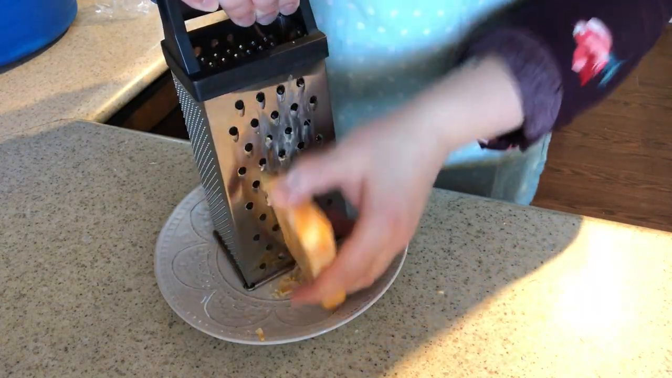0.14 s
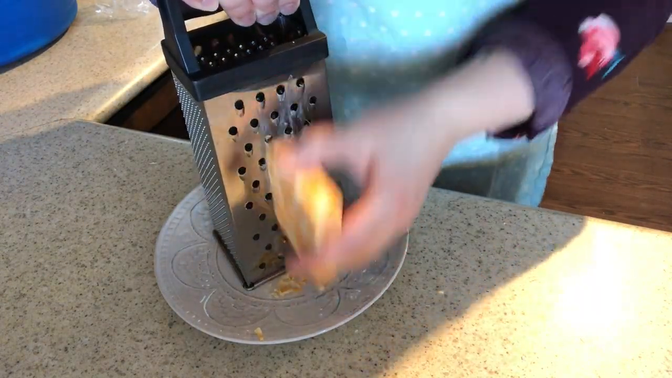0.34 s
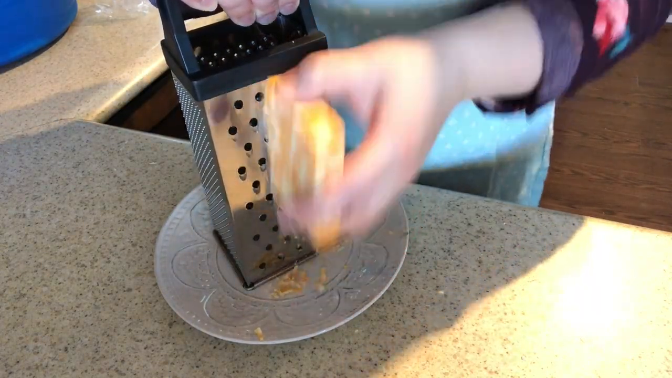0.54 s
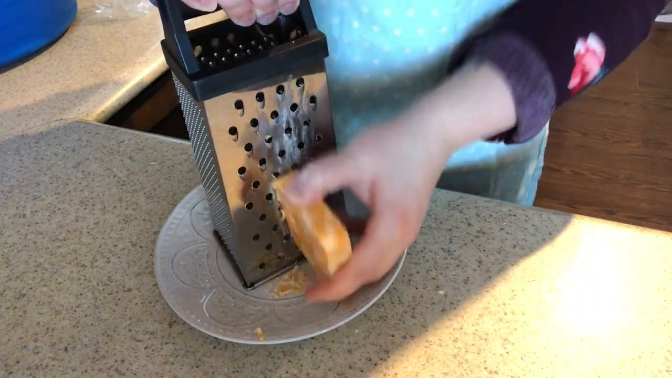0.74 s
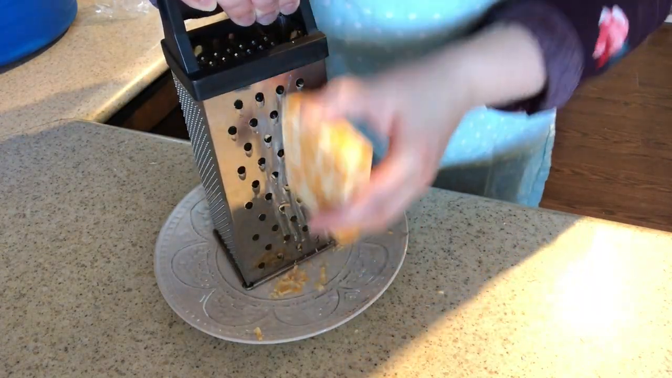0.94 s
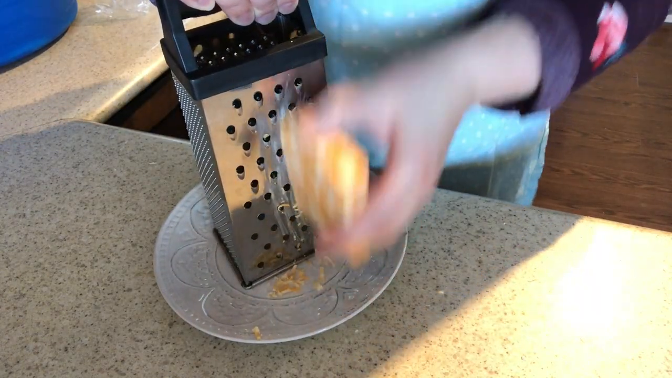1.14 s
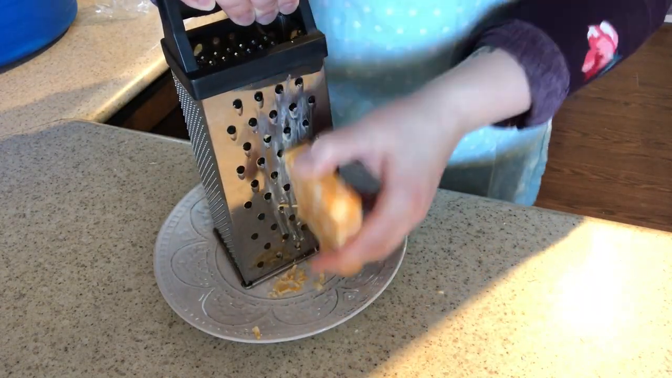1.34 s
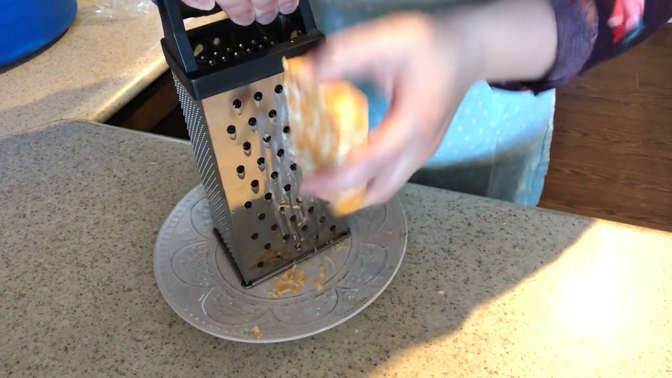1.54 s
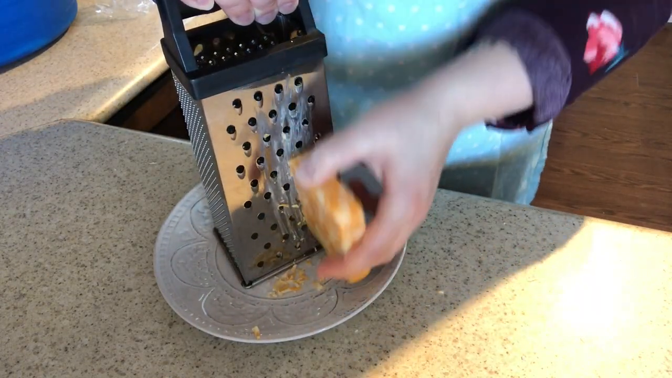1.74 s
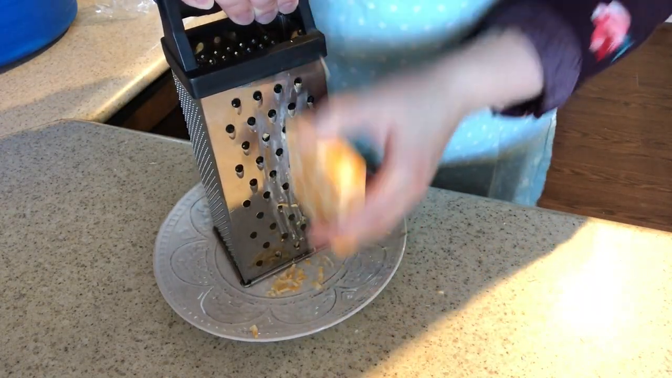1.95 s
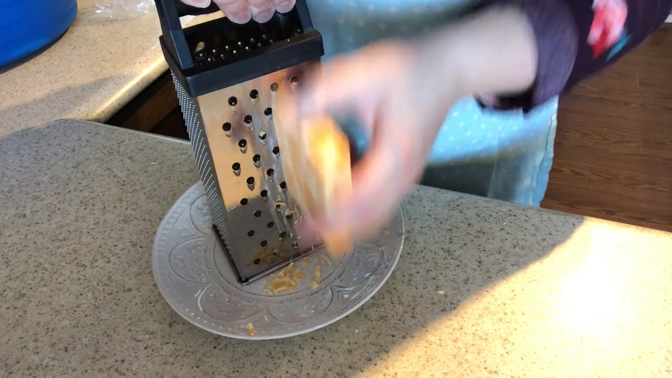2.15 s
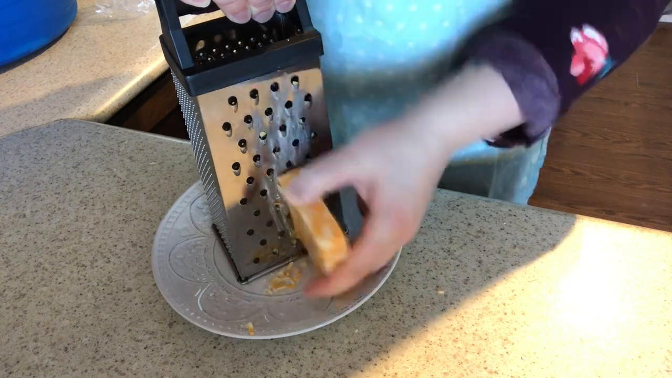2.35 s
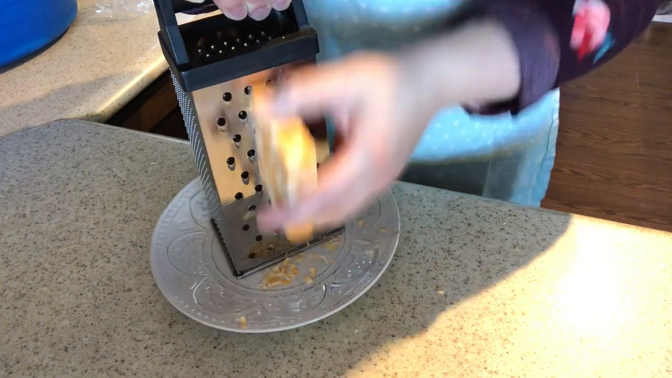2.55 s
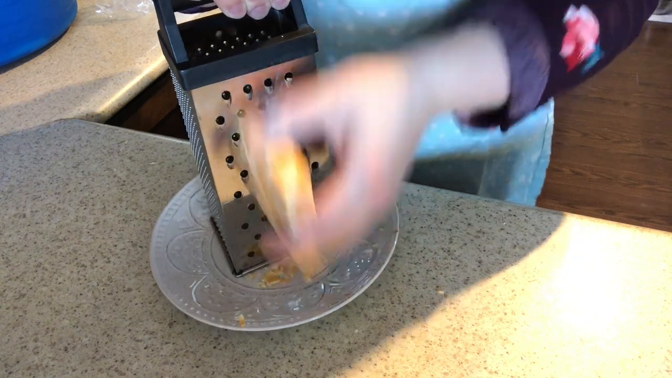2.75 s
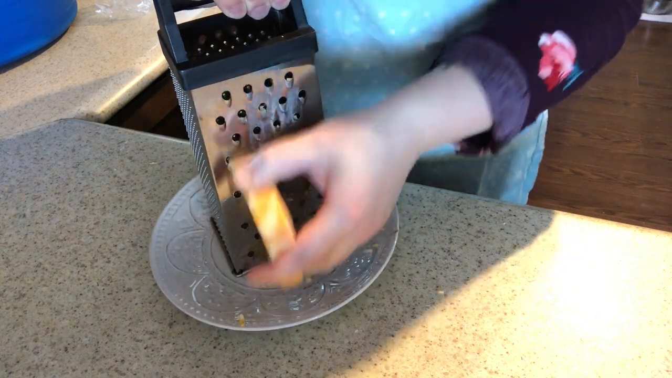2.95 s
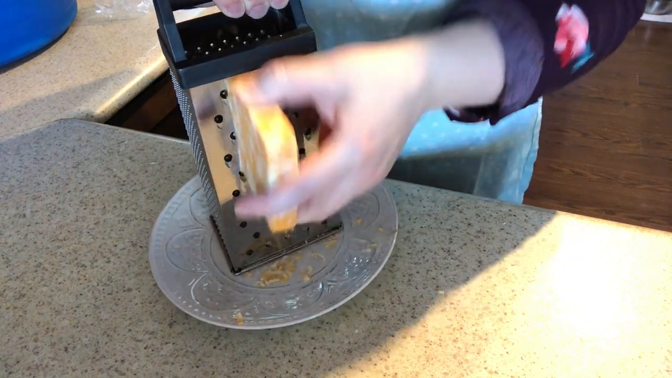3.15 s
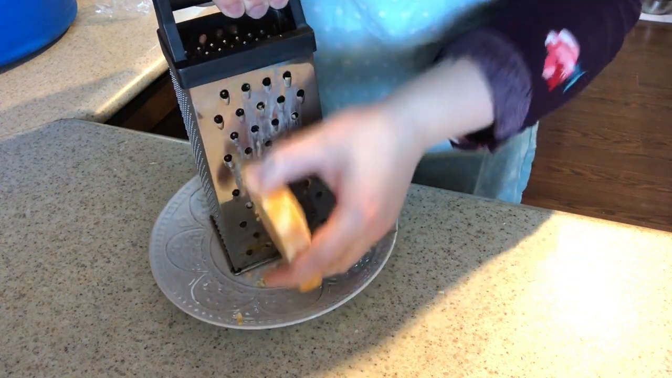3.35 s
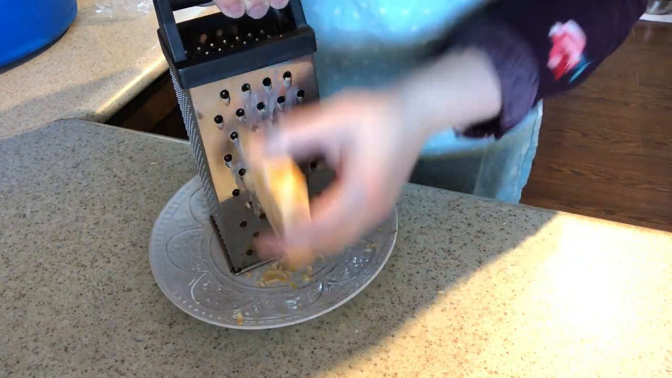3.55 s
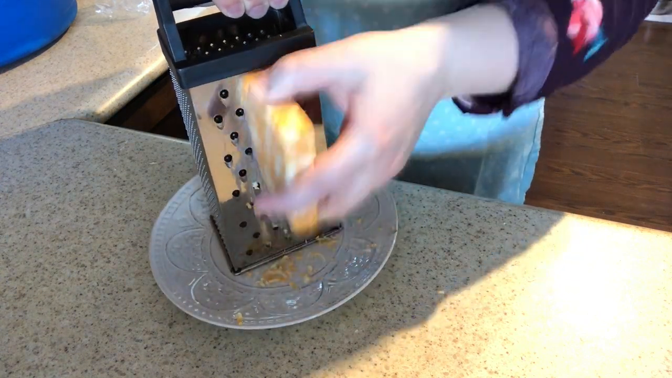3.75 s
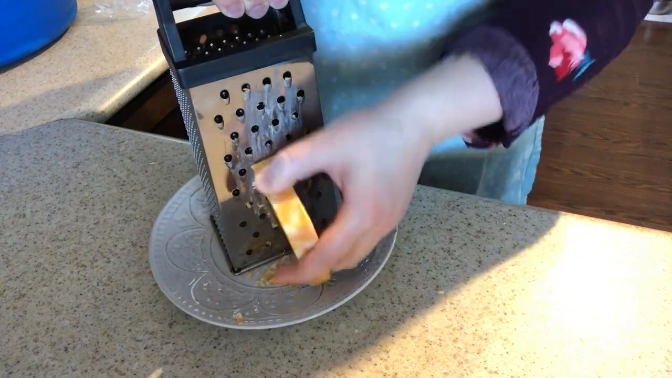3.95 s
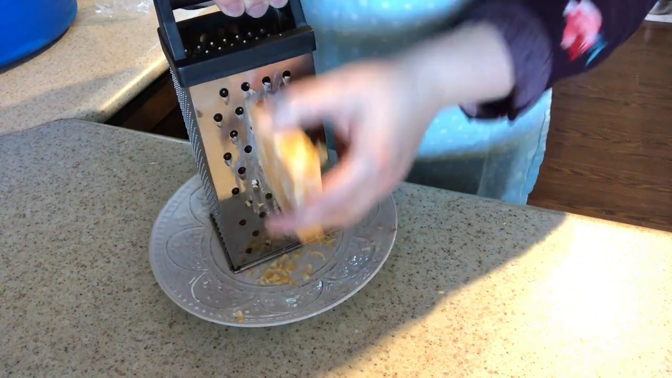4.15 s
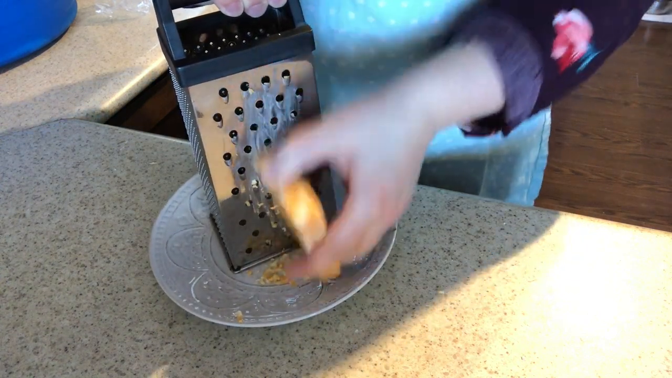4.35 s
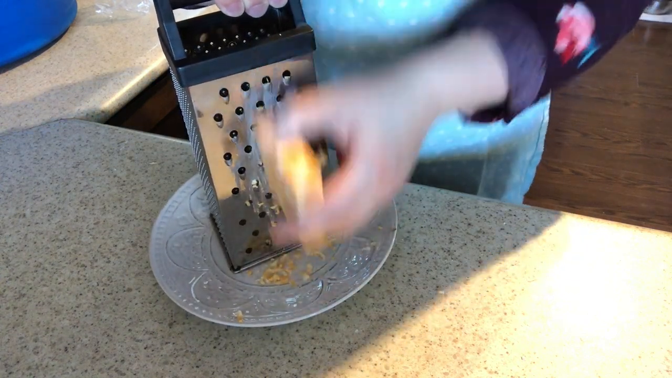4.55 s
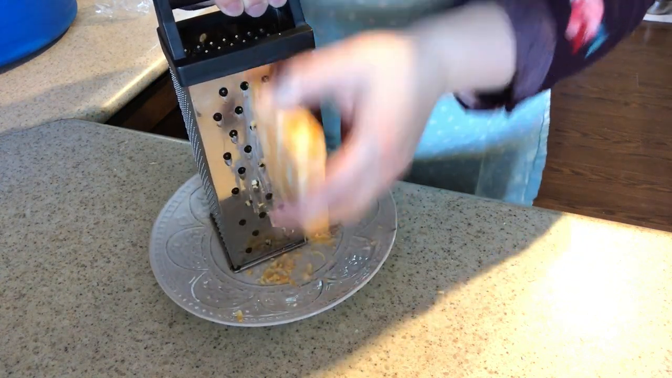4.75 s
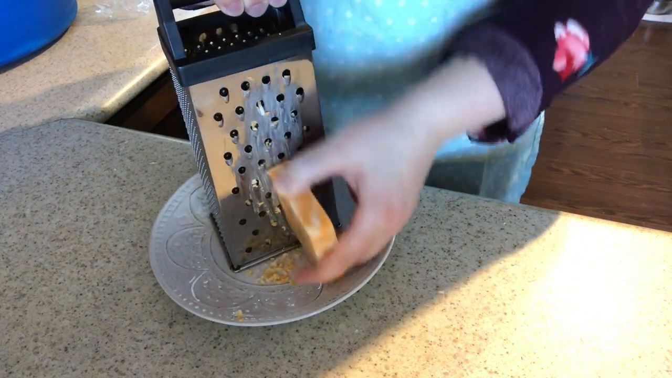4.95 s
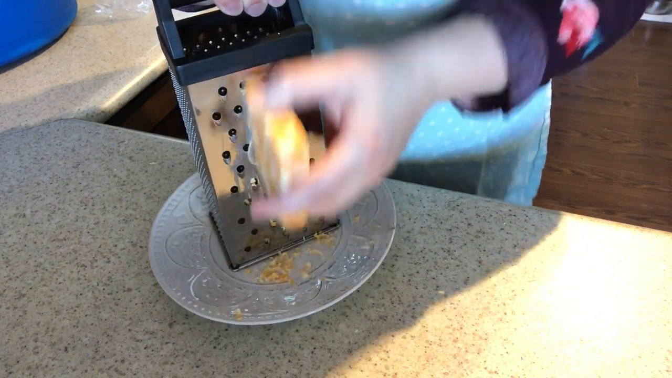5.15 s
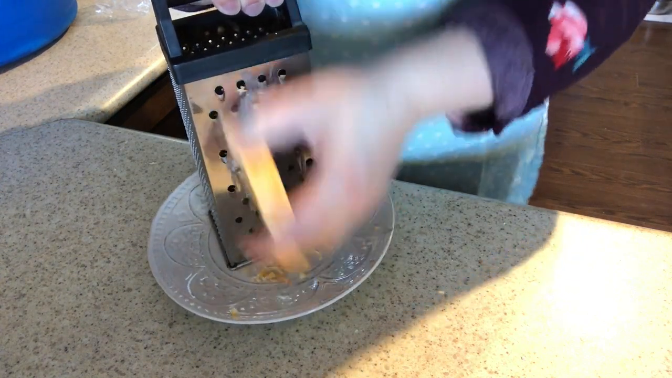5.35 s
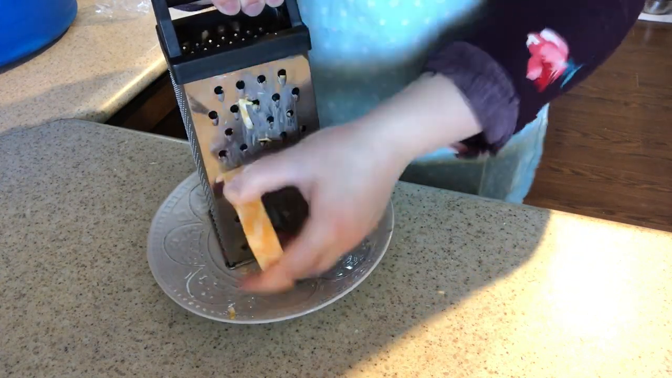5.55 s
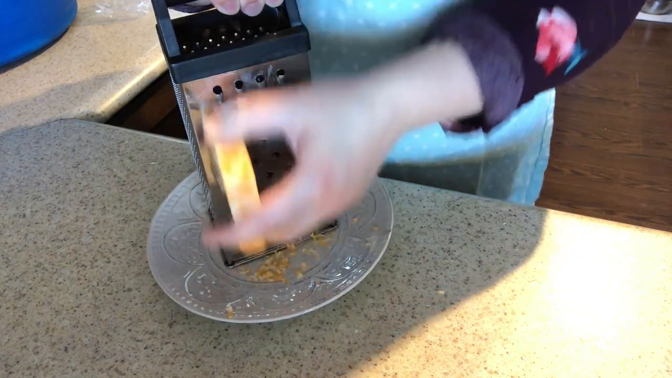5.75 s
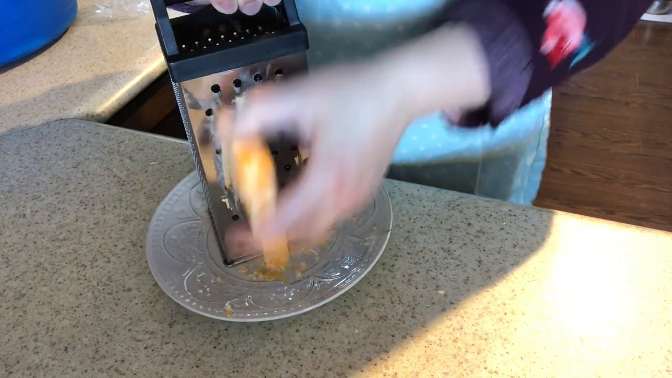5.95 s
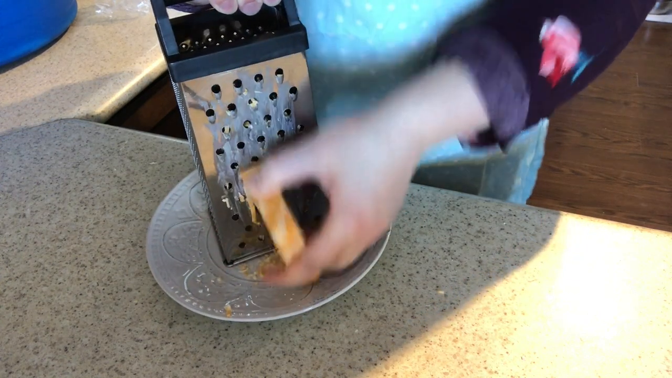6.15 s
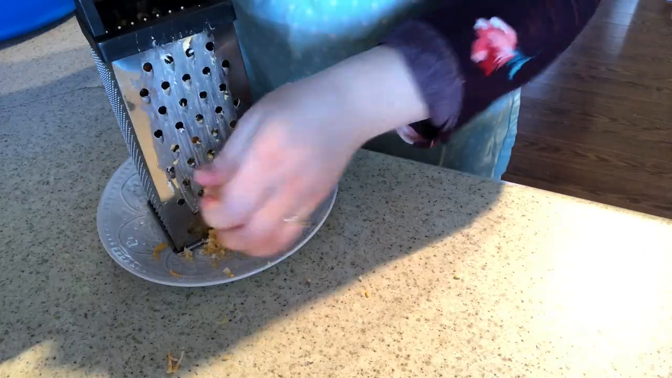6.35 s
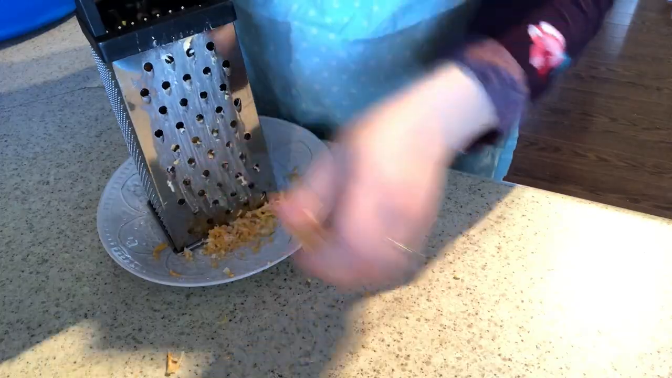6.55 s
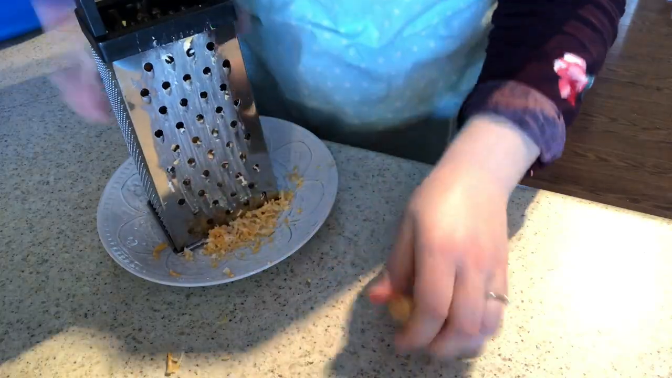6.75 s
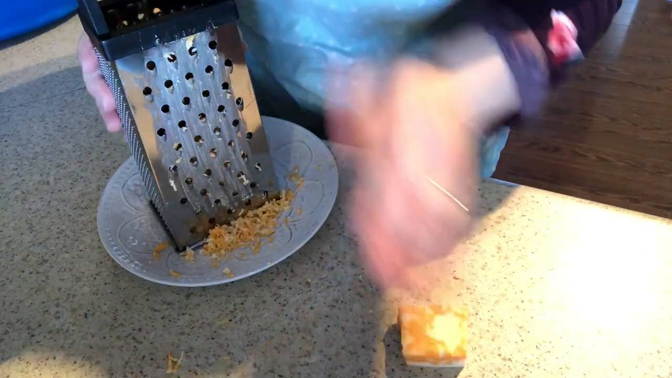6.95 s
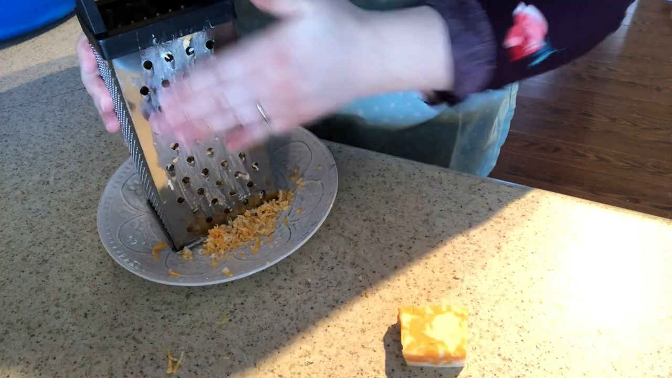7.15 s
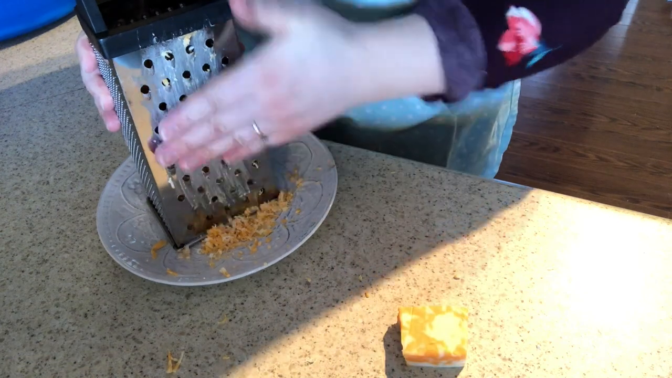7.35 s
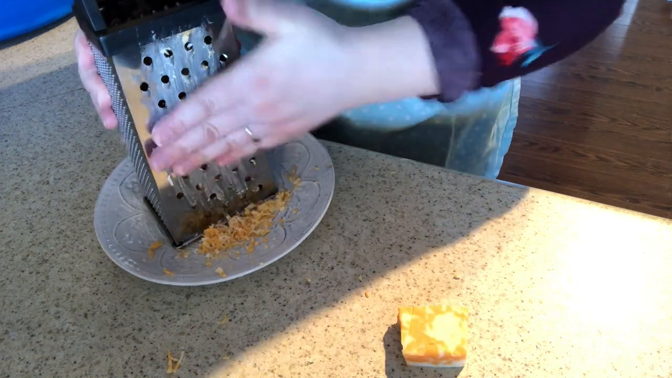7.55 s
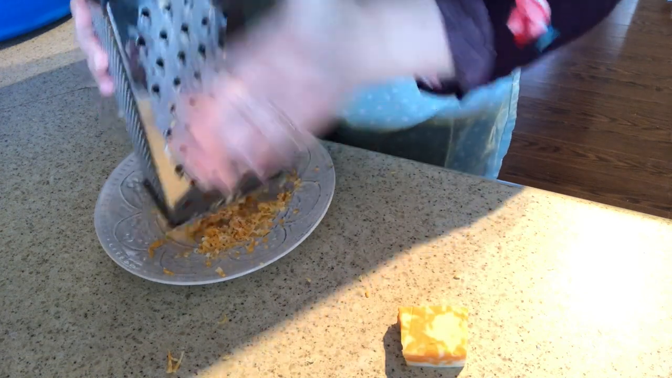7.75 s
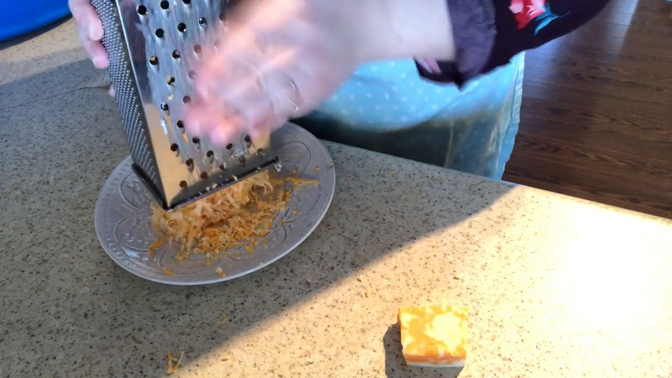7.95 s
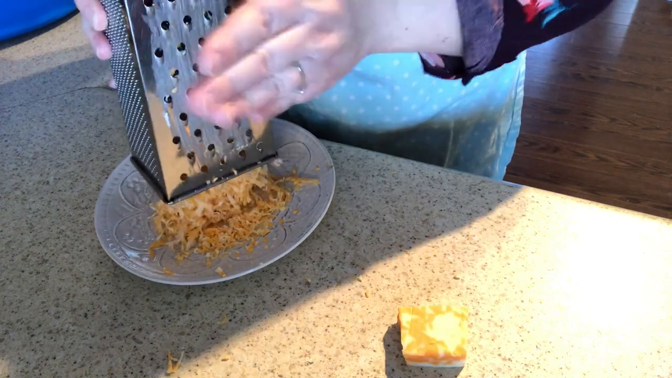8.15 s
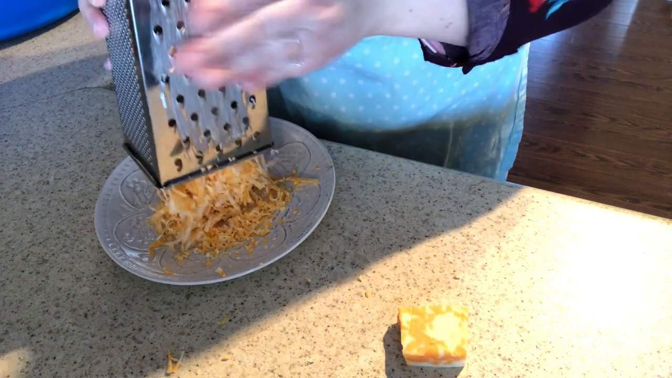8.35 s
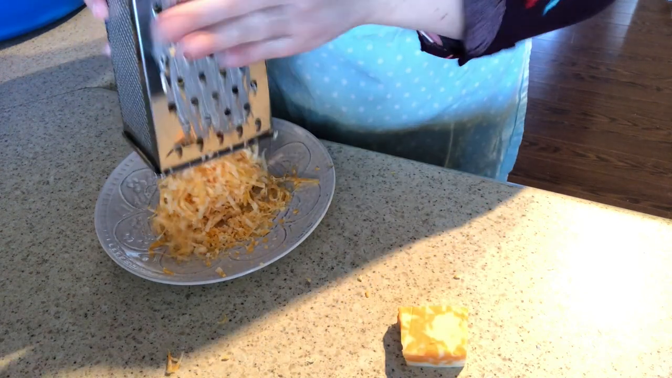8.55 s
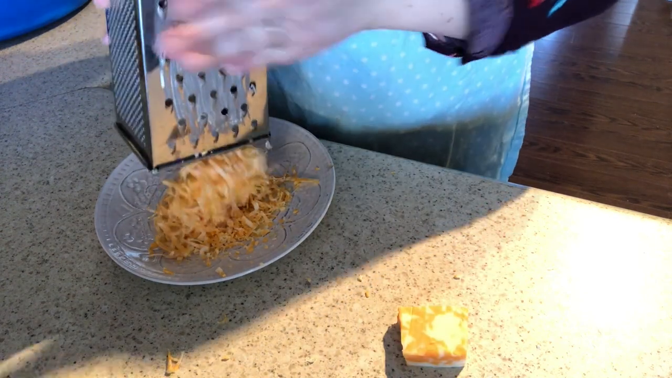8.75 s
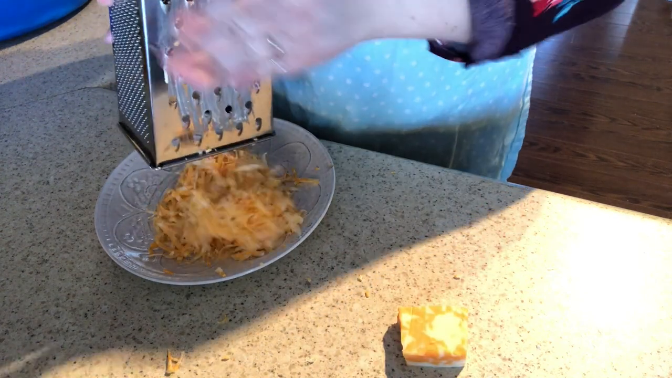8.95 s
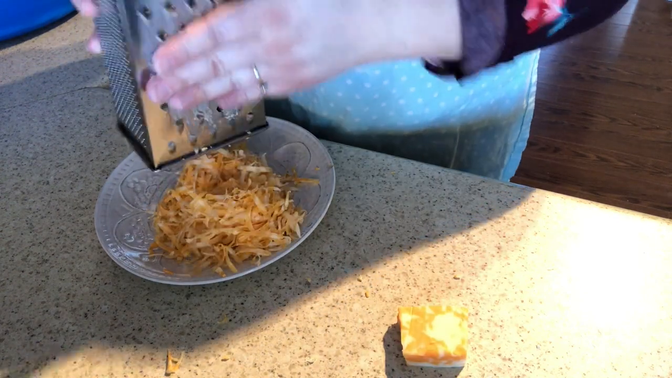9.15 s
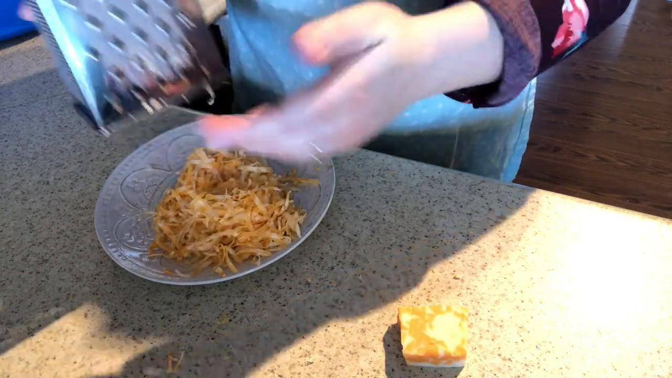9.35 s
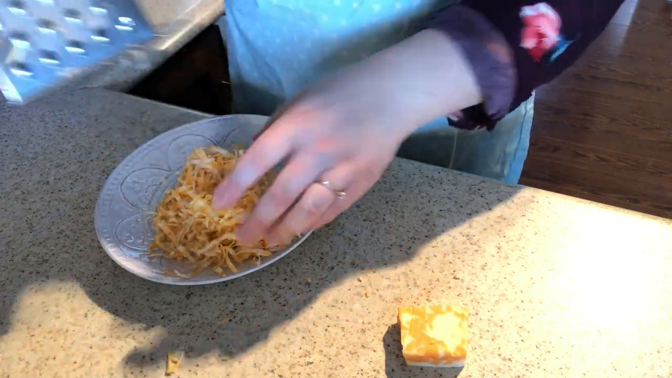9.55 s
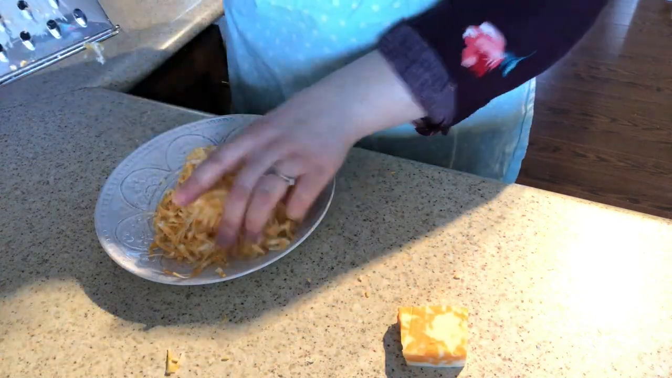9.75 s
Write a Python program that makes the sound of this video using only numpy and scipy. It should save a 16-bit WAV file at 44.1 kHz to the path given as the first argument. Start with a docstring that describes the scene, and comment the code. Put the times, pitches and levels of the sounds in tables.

```python
"""In a quiet kitchen, a block of cheese is worked down and up a steel box grater standing on a plate.
Each stroke lands with a soft smack, then the teeth catch and slip in a rumble and a rasp. Along the way
bumps boom in the counter, fingers squeak on the cheese and the grater's foot clinks the plate three times.
From about 6.5 s fingers and a sleeve rustle as the cheese is put down. From 7.1 s a flat hand slaps
the grater ten times to shake the shreds out."""
import sys
import numpy as np
from scipy import signal
from scipy.fft import rfft, irfft
from scipy.io import wavfile
from scipy.ndimage import uniform_filter1d

SR = 44100
rng = np.random.default_rng(int(sys.argv[2]) if len(sys.argv) > 2 else 0)


def digitize_waveform(pressure):
    """Quantize a signal to 16-bit integers and store it at the path in sys.argv[1].

    Rows of a 2-D input are taken as channels; values are limited to [-1, 1].
    """
    field = np.atleast_2d(pressure).T
    bounded = np.clip(field, -1, 1)
    quanta = np.round(bounded * 32767).astype(np.int16)
    wavfile.write(sys.argv[1], SR, quanta)


N = 432180
HIT_SAMPLES = 12288
HIT_TIME = np.arange(HIT_SAMPLES) / SR


def from_db(db):
    """Decibels to gain."""
    return 10 ** (np.asarray(db) / 20)


def unit(x):
    """Scale to rms 1."""
    return x / np.sqrt(np.mean(x ** 2) + 1e-20)


def at_hz(points, hz):
    """Read a curve along a log-frequency axis."""
    known_hz, values = np.transpose(points)
    return np.interp(np.log(np.maximum(hz, 1)), np.log(known_hz), values)


def bins(x):
    """Frequencies of the spectrum of x."""
    return np.fft.rfftfreq(len(x), 1 / SR)


def eq(x, curve):
    """Shape x with a smooth EQ curve."""
    return irfft(rfft(x) * from_db(at_hz(curve, bins(x))), len(x))


def band(x, low_hz, high_hz):
    """Causal band-pass."""
    edges_hz = [low_hz, min(high_hz, .45 * SR)]
    return signal.sosfilt(signal.butter(2, edges_hz, "band", fs=SR, output="sos"), x)


def add(out, s, sound):
    """Mix a sound in at time s."""
    start = max(round(s * SR), 0)
    out[start:start + len(sound)] += sound[:N - start]


def envelope(rise_s, t60):
    """A percussive attack and an exponential decay."""
    return (1 - np.exp(-HIT_TIME / rise_s)) * from_db(-60 * HIT_TIME / t60)


def burst(rise_s, t60):
    """A dense spray of tiny contacts that swells and dies away."""
    return rng.standard_normal(HIT_SAMPLES) * envelope(rise_s, t60)


def grains(per_s, spread_db):
    """Random clicks of uneven size."""
    sizes = from_db(spread_db * np.minimum(rng.exponential(1, N), 4))
    return (rng.random(N) < per_s / SR) * sizes * rng.choice([-1, 1], N)


def wander(per_s):
    """A smooth random curve of spread about 1."""
    knots = rng.standard_normal(4000)
    return np.interp(np.arange(N) / SR * per_s, np.arange(len(knots)), knots)


def swells(starts_s, lengths_s, levels_db, attack_s, release_s, ramp_db_per_s):
    """A gain curve of gestures: each fades in, ramps through its level and tails off gently."""
    out = np.zeros(N)
    for s, length_s, db in zip(starts_s, lengths_s, levels_db):
        t = np.arange(0, length_s, 1 / SR)
        fade_in = np.sin(np.pi / 2 * np.clip(t / attack_s, 0, 1))
        fade_out = np.sin(np.pi / 2 * np.clip((length_s - t) / release_s, 0, 1)) ** 1.4
        add(out, s, from_db(db + ramp_db_per_s * (t - length_s / 2)) * fade_in * fade_out)
    return out


# the still kitchen's noise floor: (frequency [Hz], level [dB])
ROOM_TONE_EQ = [(18, -30), (30, 2), (48, -8.5), (59, -11), (141, -11), (179, -13), (311, -21.5),
                (449, -19.5), (1390, -30), (14400, -44), (16000, -44.5)]


def room_tone():
    """A faint, dark bed of noise under the whole scene."""
    return from_db(-67.5) * unit(eq(rng.standard_normal(N), ROOM_TONE_EQ))


# modes of the hand-held steel shell: (frequency [Hz], width [Hz], weight [dB, halved in use])
SHELL_MODES = [(329.3, 58, 7.5), (536, 42, -9.5), (1120, 11, -15.5), (2247, 55, 2.5), (3520, 190, -9),
               (4180, 27, -14), (5140, 990, -12.5), (5824, 50, -8), (6300, 52, -7), (6500, 80, -2),
               (7400, 1200, -1.5)]


def shell(x, ring_db):
    """Resonances stand out of the broad sound of the grater's walls; each new grip detunes them."""
    hz = bins(x)
    detunes = 1 + .015 * rng.standard_normal(len(SHELL_MODES))
    modes = sum(from_db(db / 2) / (1 + 2j * (hz - centre * detune) / width)
                for (centre, width, db), detune in zip(SHELL_MODES, detunes))
    return irfft(rfft(x) * (1 + from_db(ring_db) * modes), len(x))


# strokes, about three round trips a second:
# (time [s], length [s], landing smack level [dB], rumble level [dB], rasp level [dB])
GRATER_STROKES = [(0.0, 0.14, -64, -49, -63), (0.078, 0.12, -68, -49.5, -68.5),
                  (0.162, 0.15, -58, -54.5, -62.5), (0.305, 0.17, -49.5, -53.5, -64.5),
                  (0.4606, .16, -48, -52.5, -62.5), (0.621, 0.17, -54, -51, -61.5),
                  (0.791, 0.16, -62, -56, -66), (0.96, .22, -63.5, -51, -65),
                  (1.279, 0.15, -67, -54.5, -64), (1.423, 0.21, -54.5, -52.5, -59.5),
                  (1.584, 0.16, -49.5, -51.5, -62.5), (1.773, .14, -51.5, -50, -59.5),
                  (1.919, 0.17, -54, -49, -60), (2.074, 0.19, -53, -51, -61), (2.253, 0.26, -63, -47, -61),
                  (2.431, 0.16, -49, -82, -57.5), (2.566, 0.2, -56, -52.5, -61.5),
                  (2.712, 0.15, -46.5, -47, -60.5), (2.859, 0.16, -52, -53.5, -62.5),
                  (3.037, 0.13, -49.5, -47.5, -58.5), (3.171, 0.19, -58.5, -53.5, -61.5),
                  (3.365, 0.16, -52.5, -52.5, -62.5), (3.512, 0.16, -65, -53.5, -63),
                  (3.667, 0.18, -48.5, -51, -61.5), (3.829, 0.15, -68, -55.5, -64),
                  (3.997, 0.16, -48.5, -48, -60.5), (4.158, 0.16, -67, -51, -63.5),
                  (4.318, 0.19, -59, -53, -66), (4.473, 0.22, -62.5, -52, -62.5),
                  (4.651, 0.17, -48, -53.5, -61), (4.831, 0.16, -71.5, -46.5, -57.5),
                  (4.975, 0.18, -60, -51.5, -63), (5.129, 0.19, -71, -51, -62),
                  (5.289, 0.15, -45, -48, -57.5), (5.445, .16, -65.5, -48.5, -61),
                  (5.587, 0.16, -56.5, -48.5, -58.5), (5.722, 0.24, -53, -48, -60),
                  (5.91, 0.13, -58.5, -50.5, -63), (6.035, 0.22, -71, -51.5, -63),
                  (6.149, 0.16, -45, -51.5, -63), (6.475, 0.17, -77, -50, -64)]
# low end of the pressed sheet: (frequency [Hz], level [dB])
RUMBLE_EQ = [(18, -46), (30, -17.5), (65, -1), (113, -6), (152, 2.5), (194, -3), (254, -0.5), (284, -11.5),
             (389, -5), (436, -18), (900, -24), (1170, -48), (1980, -120)]
# grit of the teeth: (frequency [Hz], level [dB])
RASP_EQ = [(290, -37.5), (500, 0.5), (595, -11.5), (761, 0.5), (1420, -5), (2130, -7), (2330, -8.5),
           (4530, -12.5), (8700, -26.5), (15100, -27), (16000, -33.5)]


def grating():
    """Teeth catch and slip: big slips shake the sheet, fine tearing makes the rasp."""
    s, length_s, _, rumble_db, rasp_db = np.transpose(GRATER_STROKES)
    # the hand leans in, then eases off before the turn
    pressure = swells(s, length_s, rumble_db, attack_s=.06, release_s=.093, ramp_db_per_s=14)
    # the teeth bite sooner than the sheet shakes, and the rasp fades as the holes fill
    tearing = swells(s, length_s, rasp_db, attack_s=.044, release_s=.092, ramp_db_per_s=-24)
    # shreds tear off in clumps as each row of teeth bites
    bite = wander(per_s=70)
    slips = grains(per_s=600, spread_db=2) * from_db(.6 * bite)
    rumble = unit(eq(slips, RUMBLE_EQ))
    tears = grains(per_s=4100, spread_db=-3) * from_db(2 * bite)
    rasp = unit(eq(shell(tears, ring_db=.5), RASP_EQ))
    # whole shreds snap off with a tick, thick ones dull and thin ones bright
    snaps = np.zeros(N)
    for low_hz in (900, 2200, 4500):
        ticks = signal.fftconvolve(grains(per_s=12, spread_db=1.8), burst(rise_s=.0002, t60=.018))
        snaps += band(ticks[:N], low_hz, 4 * low_hz)
    crackle = unit(eq(snaps, RASP_EQ))
    return from_db(-.47) * pressure * rumble + tearing * (from_db(-1) * rasp + from_db(-5.5) * crackle)


# edges of the thump, body, clang and crack bands: (frequency [Hz])
CROSSOVERS = [20, 280, 700, 2500, 20000]


def sheet_hit(force, band_db, lag_s):
    """A hit on the sheet, mixed by band; three levels omit the thump. lag_s is the delay at 1 kHz."""
    hz, out = bins(force), 0
    # bending waves travel with the root of frequency: the treble arrives first, the bass last
    spectrum = rfft(force) * np.exp(-4j * np.pi * lag_s * np.sqrt(1000 * hz))
    for db, high, low in zip(band_db[::-1], CROSSOVERS[::-1], CROSSOVERS[-2::-1]):
        passband = (1 - 1 / (1 + (hz / low) ** 6)) / (1 + (hz / high) ** 6)
        out = out + from_db(db) * unit(irfft(spectrum * passband))
    return out * np.linspace(1, 0, len(out))


# stray taps of fingers and cheese on grater and counter: (time [s], level [dB], tilt [dB per band])
STRAY_TAPS = [(0.103, -65, 6.5), (3.087, -53, -6), (4.064, -55.5, -8), (5.6424, -48, -1.5),
              (5.828, -49.5, -5.5), (5.9465, -59, 9.5), (6.086, -63.5, 14.5), (6.285, -58, -8.5),
              (6.5142, -52.5, -9), (6.809, -66.5, -16), (6.843, -53, -7), (6.893, -61, -12.5),
              (6.945, -63, -2), (7.08, -51, -7)]
# tone of a soft contact: (frequency [Hz], level [dB])
TOUCH_EQ = [(120, -43), (200, 7), (1400, -11), (2130, -9), (2420, -15), (3430, -16), (5040, -19),
            (8420, -36), (16000, -38.5)]


def touches():
    """The soft block smacks onto the teeth at the start of each stroke; stray taps sound alike."""
    # a firm landing is brighter than a gentle one
    firm_db = -48.5
    landings = [(s, db, -1.46 + .064 * (db - firm_db)) for s, _, db, *_ in GRATER_STROKES]
    out = np.zeros(N)
    for s, db, tilt_db in landings + STRAY_TAPS:
        force = eq(shell(burst(rise_s=.0003, t60=.058), ring_db=-10), TOUCH_EQ)
        band_db = [db - tilt_db, db + 1, db + tilt_db]   # the sheet favours the mids
        add(out, s, from_db(-17) * sheet_hit(force, band_db, lag_s=.001507))
    return out


# dull knocks through the counter: (time [s], level [dB], pitch [Hz], t60 [s])
COUNTER_KNOCKS = [(0.103, -29.5, 153, 0.062), (1.525, -32, 151.6, 0.21), (2.371, -25.5, 140, 0.09),
                  (4.932, -34.5, 137, 0.17), (5.827, -17, 149.6, 0.13), (6.15, -33, 254, 0.087),
                  (6.806, -31, 203, 0.12), (6.9431, -25, 220, 0.09), (7.125, -17, 251, 0.11),
                  (7.153, -34.5, 248, 0.16), (7.217, -28.5, 208, 0.082), (7.349, -20.5, 249, 0.11),
                  (7.557, -25.5, 147.6, 0.14)]


def knocks():
    """Heavy, soft bumps of grater and cheese boom in the counter."""
    out = np.zeros(N)
    for s, db, hz, t60 in COUNTER_KNOCKS:
        boom = np.sin(2 * np.pi * hz * HIT_TIME) * envelope(rise_s=.0024, t60=t60)
        shudder = unit(band(burst(rise_s=.003, t60=t60), hz * .35, hz * 1.4))
        add(out, s, from_db(db) * (from_db(-2.5) * boom + from_db(-23) * shudder))
    return out


# cheese squeaking under the fingers: (time [s], pitch [Hz], level [dB], t60 [s])
CHEESE_SQUEAKS = [(0.798, 2600, -57, 0.067), (6.087, 2140, -37, 0.037), (6.098, 2650, -49, 0.071),
                  (6.548, 3120, -48.5, 0.049)]


def squeaks():
    """Short, rough chirps of skin slipping on cheese."""
    out = np.zeros(N)
    for s, hz, db, t60 in CHEESE_SQUEAKS:
        roughness = np.cumsum(.07 * rng.standard_normal(HIT_SAMPLES))
        tone = np.sin(2 * np.pi * hz * HIT_TIME + roughness)
        add(out, s, from_db(db) * envelope(rise_s=.0011, t60=t60) * tone)
    return out


# the grater's foot hitting the plate: (time [s], level [dB], tilt [dB per octave])
FOOT_CLINKS = [(1.0603, -10, -4.5), (2.3568, -6.5, -1.3), (4.9318, -9.5, -3)]
# the plate's ring: (frequency [Hz], level [dB], t60 [s])
PLATE_MODES = [(1665, -24, .17), (2280, -19, .1), (2535, -19, .12), (2611, -17, .12), (3080, -15, .07),
               (3480, -8, .06), (3522, -3, .11), (4652, 0, .11), (4720, -9, .06), (4940, -13, .07),
               (5926, -5, .13), (6113, -6, .09), (6955, -17, .08), (7367, -4, .11), (8045, -18, .1),
               (8328, -15, .1), (8922, -10, .09), (10657, -9, .09), (12462, -10, .09), (14410, -12, .08)]


def clinks():
    """Steel on the plate: a hard crack, then the plate's modes, a little different each time."""
    out, t = np.zeros(N), HIT_TIME
    hz, mode_db, t60 = np.transpose(PLATE_MODES)[:, :, None]
    for s, db, tilt_db in FOOT_CLINKS:
        strength = from_db(mode_db + tilt_db * np.log2(hz / hz.mean()) + rng.standard_normal(hz.shape))
        partials = np.sin(2 * np.pi * hz * t) * rng.choice([-1, 1], hz.shape)
        # the foot chatters on the rim, so each mode flutters at its own rate
        flutter_hz = rng.uniform(15, 45, hz.shape)
        flutter = 1 + .5 * np.sin(2 * np.pi * (flutter_hz * t + rng.random(hz.shape)))
        # the grater's weight soon damps most of the swing
        damping = (1 + 2.8 * np.exp(-t / .0024)) * (1 - np.exp(-t / .00066))
        modes = strength * partials * flutter * from_db(-60 * t / t60)
        ring = from_db(-23.5) * unit(damping * modes.sum(axis=0))
        crack = from_db(-35) * unit(band(burst(rise_s=.0009, t60=.075), 2300, 8200))
        clunk = from_db(-42.5) * unit(band(burst(rise_s=.00028, t60=.065), 300, 900))
        steel_shimmer = from_db(-48) * unit(band(burst(rise_s=.002, t60=.11), 3000, 7500))
        add(out, s, from_db(db) * (ring + crack + clunk + steel_shimmer))
    return out


# fingers and sleeve brushing past: (time [s], length [s], rustle level [dB], fizz level [dB])
BRUSHES = [(6.455, 0.11, -58, -72), (6.788, 0.066, -56.5, -68.5), (6.952, 0.25, -68, -94)]
# tone of the rustle: (frequency [Hz], level [dB])
RUSTLE_EQ = [(880, -25.5), (1500, -5.5), (2860, -4.5), (3120, -5), (5440, -6.5), (12600, -23.5),
             (16000, -28.5)]


def handling():
    """Fingers and a sleeve rustle as the cheese is put aside; sticky skin peels off with a fizz."""
    s, length_s, rustle_db, fizz_db = np.transpose(BRUSHES)
    shape = dict(attack_s=.059, release_s=.043, ramp_db_per_s=-1)
    rustle = unit(eq(grains(per_s=6700, spread_db=5.5), RUSTLE_EQ))
    fizz = unit(band(grains(per_s=1200, spread_db=3.5), 9500, 15500))
    return (rustle * swells(s, length_s, rustle_db, **shape)
            + fizz * swells(s, length_s, fizz_db, **shape))


# palm on the grater: (time [s], thump [dB], body [dB], clang [dB], crack [dB], hollow pitch [Hz])
PALM_SLAPS = [(7.1096, -30, -26.5, -29, -28, 340), (7.3158, -33, -26, -29, -27.5, 520),
              (7.521, -31, -25, -25.5, -24.5, 517), (7.7931, -43.5, -33, -34.5, -31.5, 336),
              (8, -42, -28.5, -28.5, -24.5, 504), (8.218, -36.5, -33.5, -27.5, -27, 426),
              (8.433, -39.5, -32, -27, -26, 445), (8.6477, -38, -33, -26.5, -28, 487),
              (8.8616, -39, -34.5, -31, -31.5, 490), (9.068, -40, -27, -31, -31.5, 500)]
# tone of a slap: (frequency [Hz], level [dB])
SLAP_EQ = [(21, -35), (35, -0.5), (286, 0.5), (684, -8.5), (1030, -11), (1550, -13), (2110, -13.5),
           (2870, -13.5), (3100, -12), (4680, -16), (5890, -16.5), (16000, -34)]


def slaps():
    """The palm hits the steel, which is damped at once while its low modes rattle on."""
    out = np.zeros(N)
    for s, *band_db, hollow_hz in PALM_SLAPS:
        smack = burst(rise_s=.0011, t60=.041)
        rattle = from_db(-7) * band(burst(rise_s=.0013, t60=.11), 45, 1700)
        # the grater's hollow box gives each slap a hollow pitch
        hollow = from_db(-3) * band(smack, hollow_hz * .87, hollow_hz * 1.13)
        # the open box hums on after the hand has stopped
        hum = from_db(-15.5) * band(burst(rise_s=.0085, t60=.35), 385, 520)
        force = eq(shell(smack + rattle + hollow + hum, ring_db=-1.5), SLAP_EQ)
        hit = from_db(-13) * sheet_hit(force, band_db, lag_s=.0022)
        # top layers ride the crack level: a thin snap of bare skin, a faint sizzle of the sheet
        snap = from_db(-23.5) * unit(band(burst(rise_s=.00093, t60=.038), 9700, 14000))
        sizzle = from_db(-31) * unit(band(burst(rise_s=.008, t60=.17), 700, 6000))
        sizzle *= np.linspace(1, 0, HIT_SAMPLES)
        add(out, s, hit + from_db(band_db[-1]) * (snap + sizzle))
    return out


# the kitchen's decay times: (frequency [Hz], t60 [s])
KITCHEN_DECAY = [(100, 0.59), (260, 0.36), (700, 0.57), (2000, 0.47), (5000, 0.46), (13000, 0.24)]


def kitchen_reverb(x, wet_db, onset_s):
    """Dense reflections build up, then each octave dies at its own rate."""
    t, tail = np.arange(SR) / SR, 0
    for low_hz in 40 * 2. ** np.arange(9):
        t60 = at_hz(KITCHEN_DECAY, low_hz * np.sqrt(2))
        tail = tail + band(rng.standard_normal(SR), low_hz, 2 * low_hz) * from_db(-60 * t / t60)
    spectrum = rfft(tail * (1 - np.exp(-(t / onset_s) ** 2)))
    # cluttered walls scatter evenly: no narrow pitch stands far out of the echo
    power = abs(spectrum) ** 2
    smoothing = np.sqrt(uniform_filter1d(power, 300) / uniform_filter1d(power, 20))
    impulse = unit(irfft(spectrum * smoothing, SR)) / np.sqrt(SR)
    return x + from_db(wet_db) * signal.fftconvolve(x, impulse[:SR * 3 // 4])[:N]


def scene():
    """Everything on the counter sounds into the kitchen, in mono over the room tone."""
    counter = grating() + touches() + knocks() + squeaks() + clinks() + handling() + slaps()
    return (room_tone() + kitchen_reverb(counter, wet_db=-15, onset_s=.0011))[None]


def record(dry):
    """The microphone rounds the highest peaks and drops the deep bass; the top is cut."""
    ceiling = from_db(-3.5)
    rounded = ceiling * np.tanh(dry / ceiling)
    low_cut = signal.butter(6, 46, "high", fs=SR, output="sos")
    high_cut = signal.ellip(10, .1, 80, 16200, fs=SR, output="sos")
    return signal.sosfilt(high_cut, signal.sosfilt(low_cut, rounded))


dry = scene()
out = record(dry)
digitize_waveform(out)
```